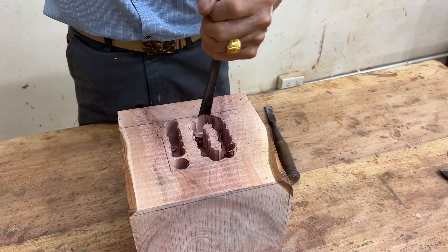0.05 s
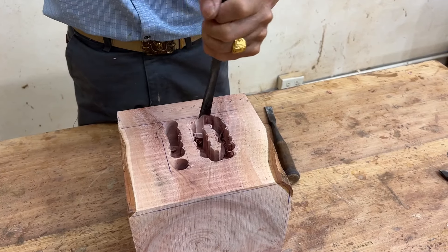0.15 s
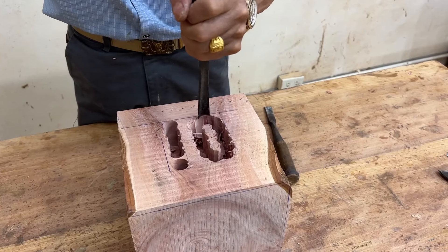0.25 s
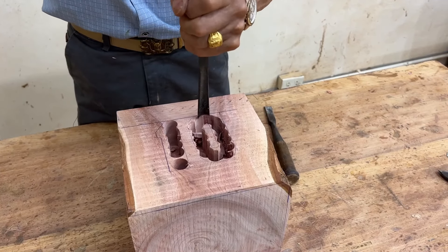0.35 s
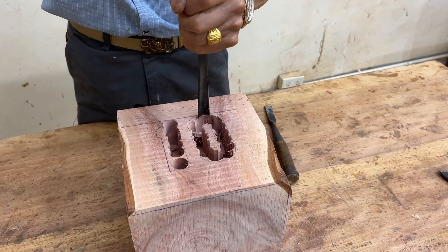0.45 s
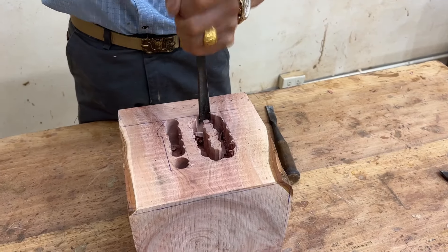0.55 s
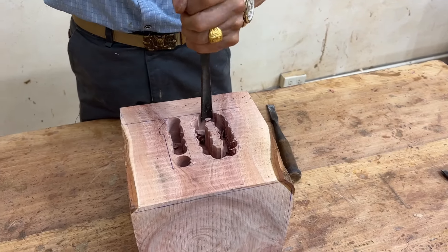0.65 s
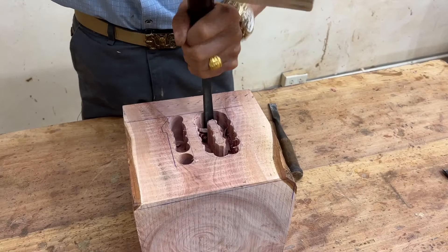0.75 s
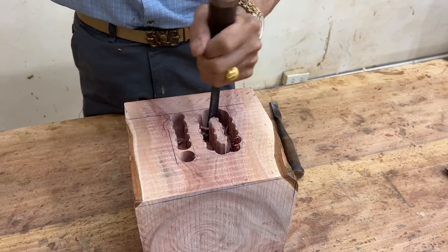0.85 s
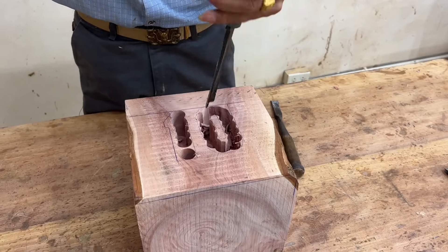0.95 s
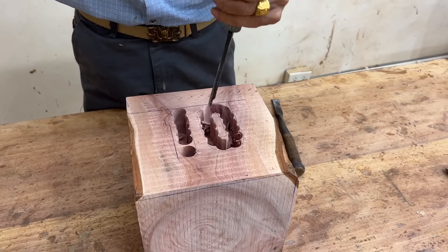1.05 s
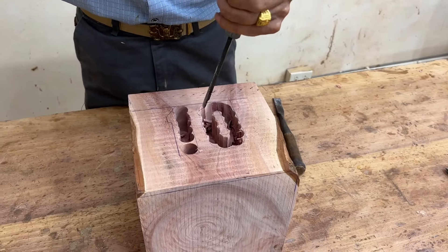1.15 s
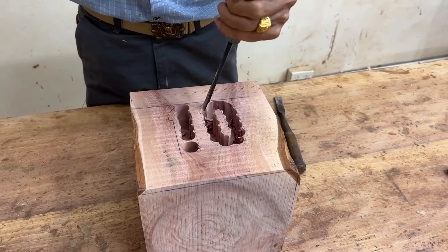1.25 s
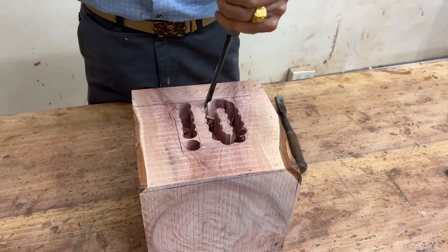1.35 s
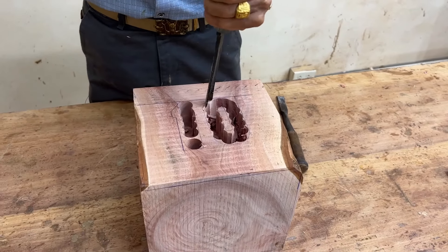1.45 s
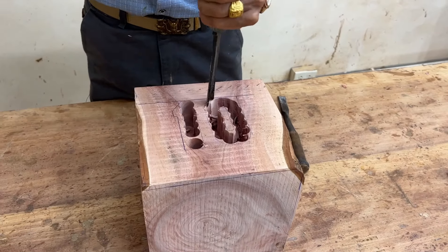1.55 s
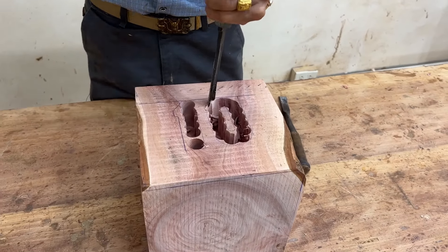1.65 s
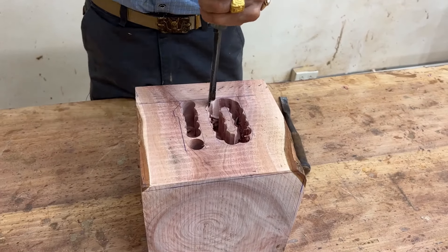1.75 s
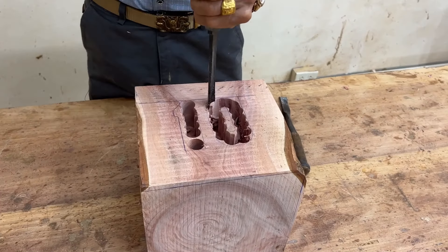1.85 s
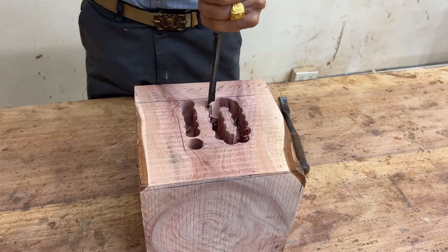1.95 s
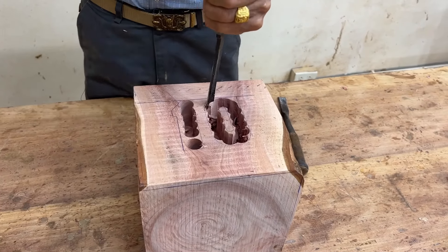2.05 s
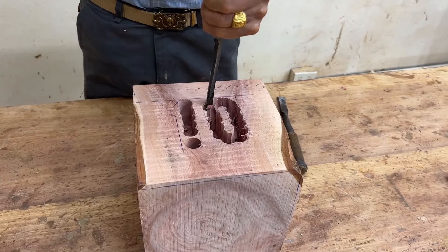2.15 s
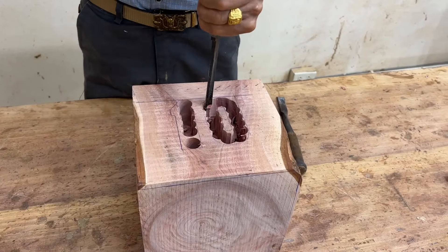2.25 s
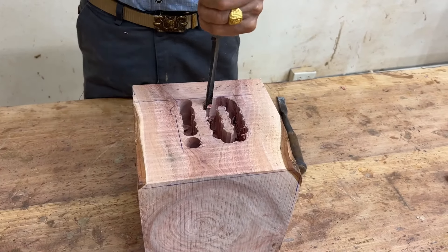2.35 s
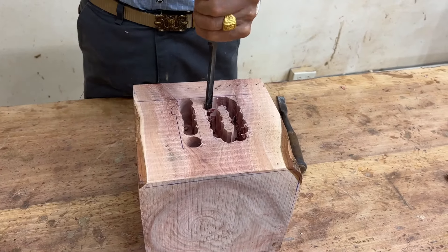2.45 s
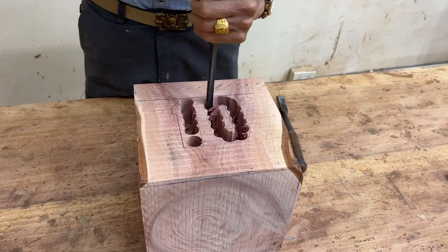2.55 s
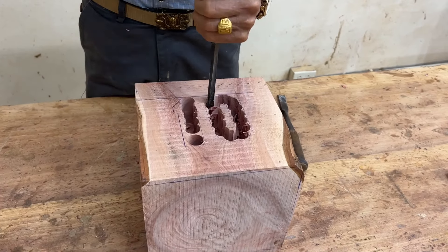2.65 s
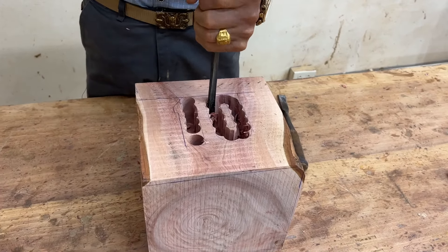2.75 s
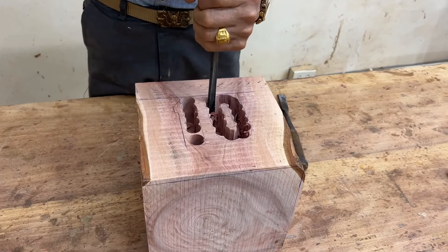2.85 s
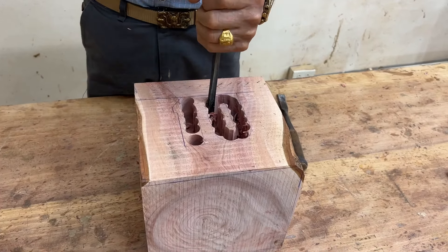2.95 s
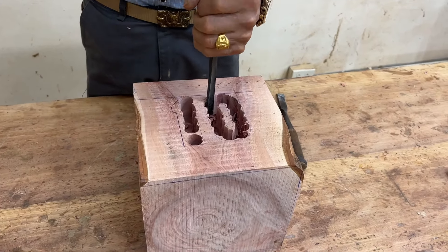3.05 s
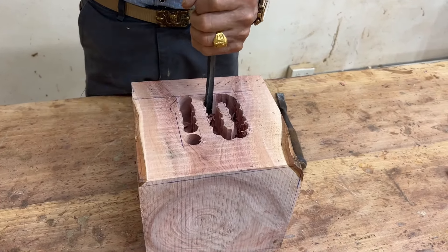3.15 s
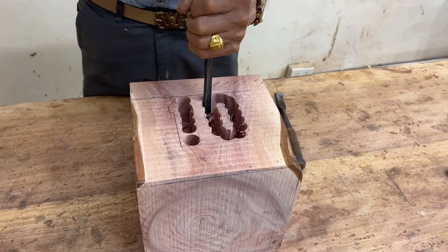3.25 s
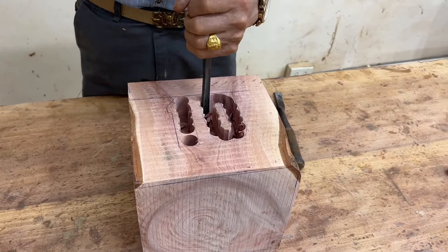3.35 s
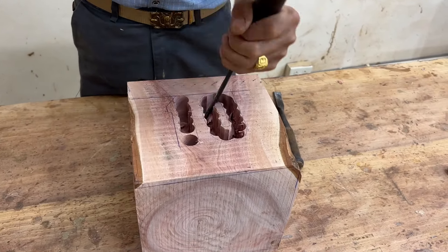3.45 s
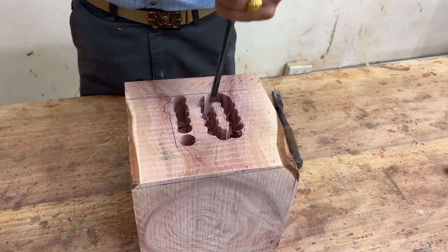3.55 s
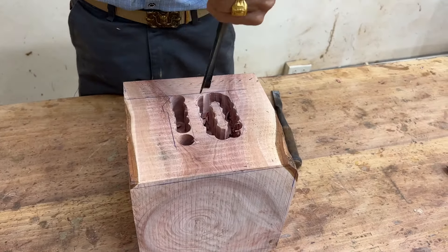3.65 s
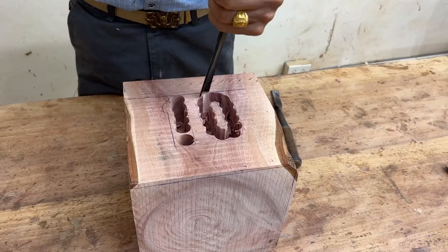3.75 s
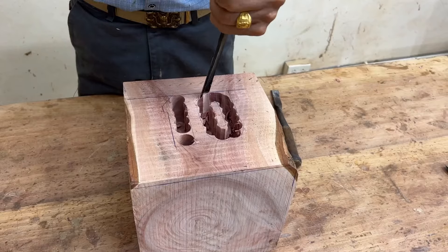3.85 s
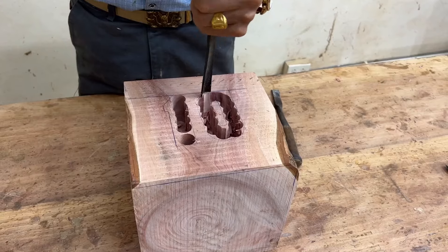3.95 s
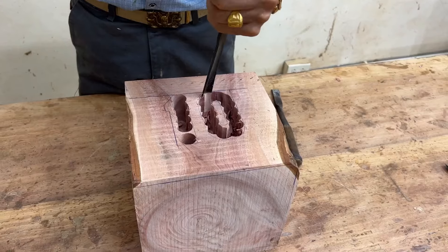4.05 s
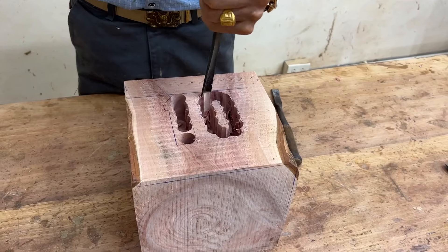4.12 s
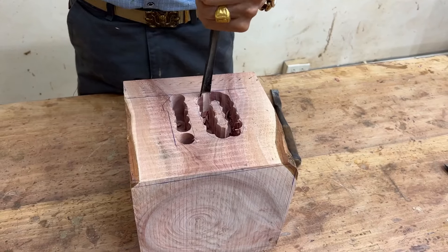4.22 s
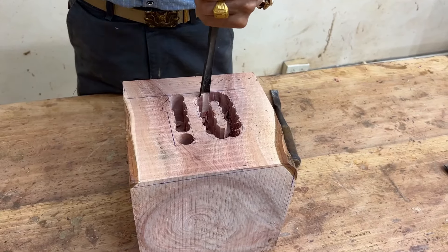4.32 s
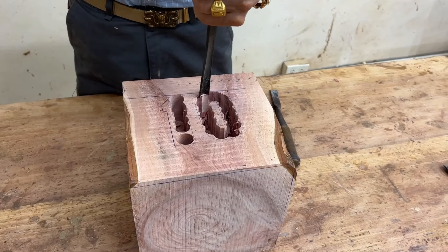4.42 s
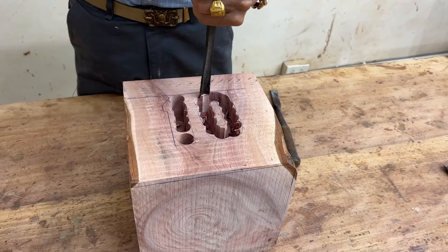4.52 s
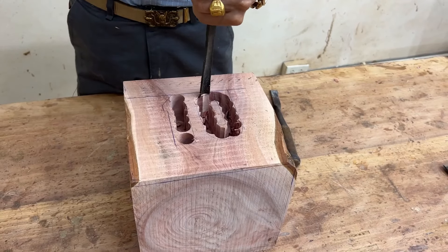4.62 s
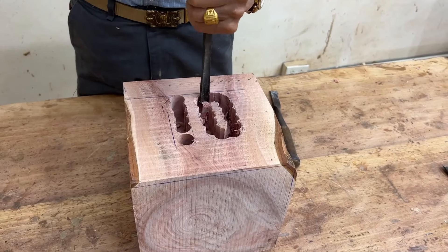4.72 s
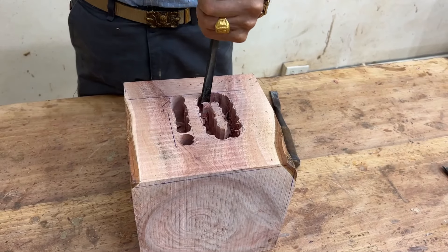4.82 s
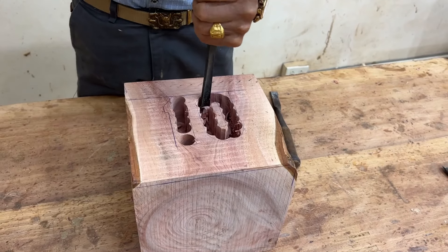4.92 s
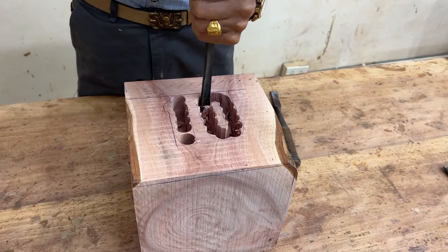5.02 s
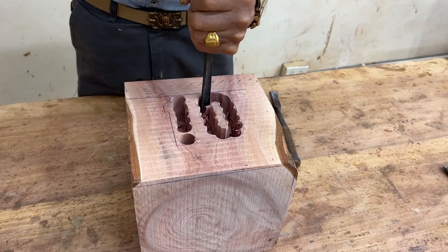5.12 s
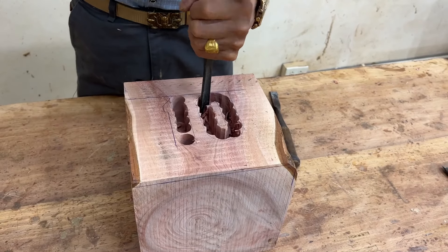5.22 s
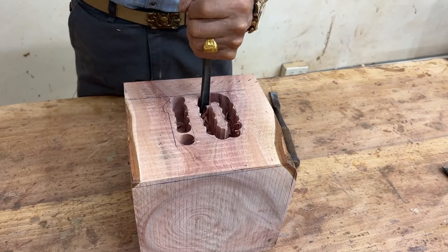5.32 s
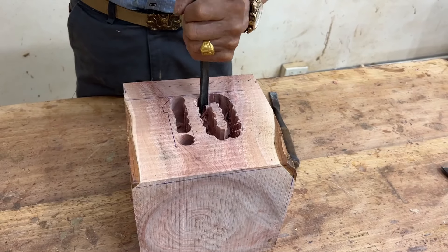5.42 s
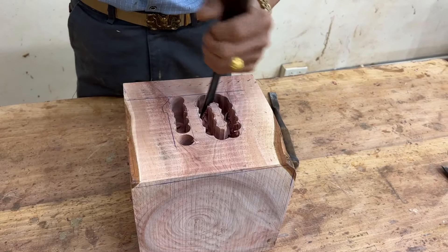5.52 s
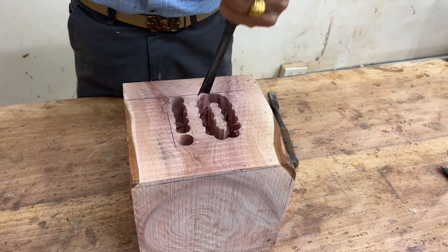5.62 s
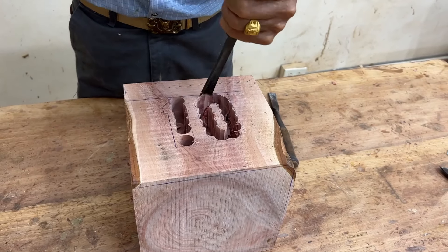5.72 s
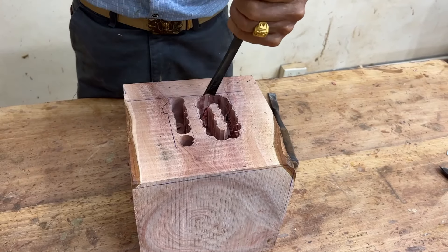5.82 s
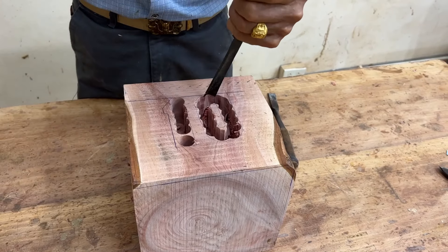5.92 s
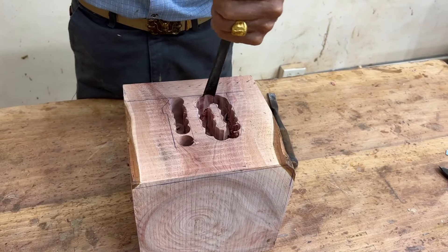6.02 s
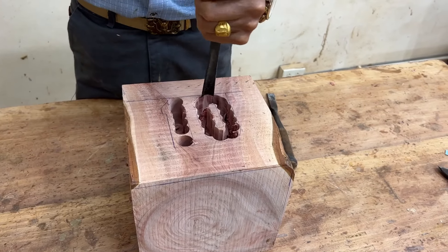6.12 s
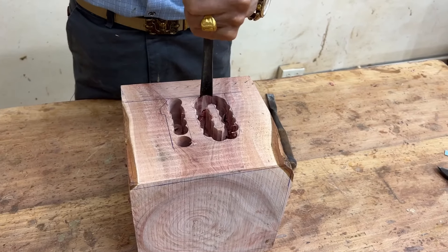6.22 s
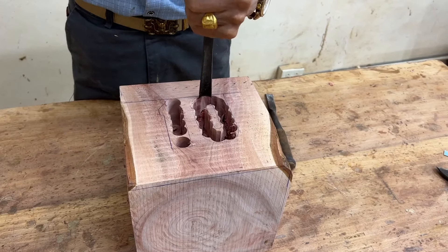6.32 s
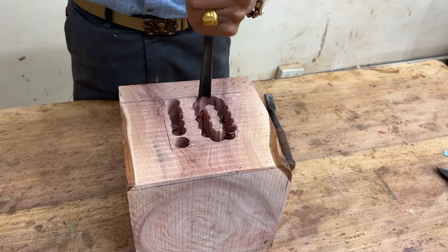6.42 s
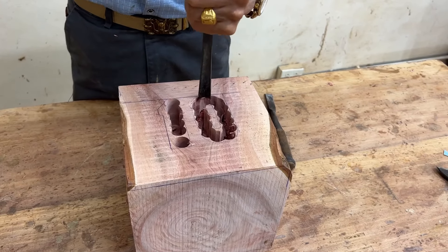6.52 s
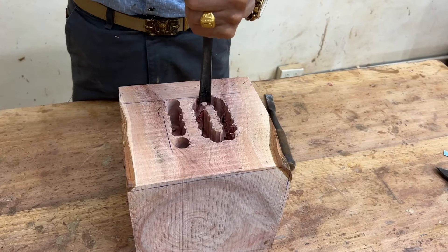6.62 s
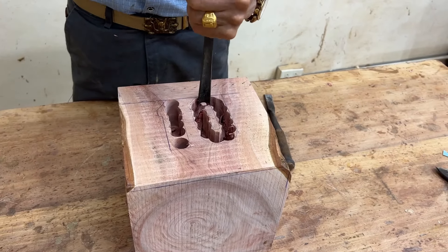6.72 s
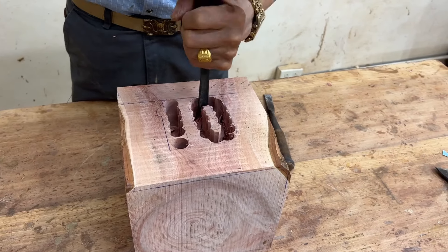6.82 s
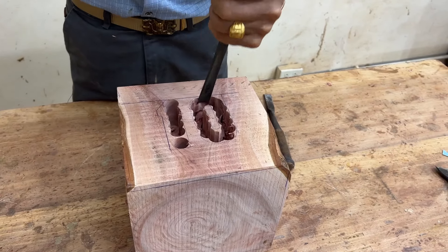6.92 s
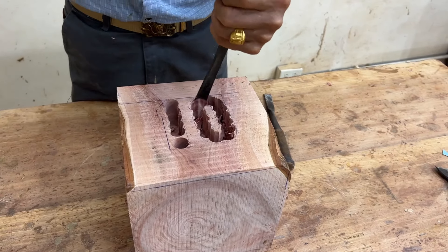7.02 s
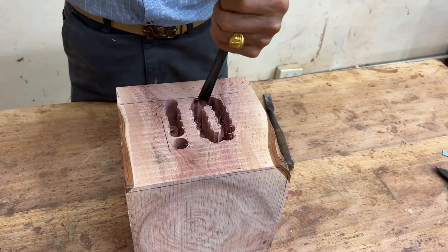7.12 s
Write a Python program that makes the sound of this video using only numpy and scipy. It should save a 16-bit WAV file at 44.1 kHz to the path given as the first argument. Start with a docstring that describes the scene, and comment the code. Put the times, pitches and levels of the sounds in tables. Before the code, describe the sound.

In a small hard-walled workshop, soft low bumps and a hollow scuff lead to two mallet blows on a chisel. After a pause, a steady run of seven sharp woody knocks follows, each booming through the bench. A dull thud, another pause, then six quicker blows. Light blade scratches and bumps precede three final knocks. Close stereo microphone, low airy room rush.

```python
"""Chiselling a hardwood block

A wooden mallet drives a chisel into a block on a workbench, in bursts of two to seven blows.
Decaying modes form the handle's clack, the mallet's knock and the block; a gliding mode booms the bench.
Shaped noise gives splitting fibres, chisel ring, scratches, hollow scuffs, soft bumps, rumble and a low rush.
Dull thuds of the block fall among the blows; a small hard-walled workshop adds early copies and a short tail.
"""
import sys
import numpy as np
from scipy import signal
from scipy.fft import rfft, irfft, next_fast_len
from scipy.io import wavfile
from scipy.ndimage import uniform_filter1d

SR = 44100
rng = np.random.default_rng(int(sys.argv[2]) if len(sys.argv) > 2 else 0)


def pcm_store(signal):
    """Save signal as 16-bit PCM."""
    levels = np.round(np.clip(np.atleast_2d(signal), -1, 1) * 32767)
    wavfile.write(sys.argv[1], SR, levels.astype(np.int16).T)


N = 316197
HIT = np.arange(SR * 3 // 5) / SR  # time since a contact, s

# All levels are relative: sources are normalised and may be trimmed where they are mixed.
# steady rush of the workshop: (f/Hz, level/dB)
AIR_SPECTRUM = [(59, -66), (100, -3), (153, -6), (193, -3.5), (266, -13), (350, -10.5), (398, -9.5),
                (492, -12.5), (648, -13.5), (721, -17), (1080, -18.5), (1610, -18.5), (3400, -37),
                (10200, -45), (16000, -67)]
# course of the rush before its trim: (t/s, level/dB)
AIR_COURSE = [(0, -45.5), (.9, -43), (3.4, -46), (3.9, -49), (5.7, -46), (7.17, -44)]
# balance of the rush: (f/Hz, left minus right level/dB)
AIR_BALANCE = [(200, -0.5), (700, -3.5), (2000, -4), (4400, 5.5), (8000, 3), (15000, -3)]
# rumble of the bench: (f/Hz, level/dB)
RUMBLE_SPECTRUM = [(12, -27), (20, -15), (75, -1), (123, -10), (156, -3.5), (189, -11), (271, -37.5),
                   (400, -21), (520, -74), (880, -120)]
# the worker's weight shifts on the bench; start to end sets the hold: (start t/s, end t/s, level/dB)
WEIGHT_SHIFTS = [(0.028, .34, -37), (6.28, 6.55, -36.5), (6.85, 7.17, -45.5)]
# soft bumps as the worker shifts against the bench: (t/s, level/dB)
SOFT_BUMPS = [(0.035, -31), (0.075, -34), (0.118, -33), (0.248, -31.5), (0.285, -28.5), (1.601, -39.5),
              (3.26, -42), (4.251, -51), (6.295, -38), (6.462, -29.5), (6.501, -43), (7.126, -35)]
# dull push of a bump: (f/Hz, level/dB)
BUMP_SPECTRUM = [(25, -4), (60, 20), (130, -5), (220, 0), (500, -39), (1500, -83)]
# hollow scuffs: (start t/s, level/dB, attack t/s, hold t/s, share of the deep colour 0-1)
HOLLOW_SCUFFS = [(0.359, -20.5, .008, 0.039, 0.25), (0.774, -24, 0.026, 0.017, 0.73),
                 (0.957, -34, 0.0099, .008, 0.99)]
# high colour of a scuff: (f/Hz, level/dB)
SCUFF_HIGH_SPECTRUM = [(100, -38), (280, -2), (450, 12), (750, 8.5), (1050, 4.5), (1400, -10.5),
                       (2200, -20.5), (5000, -55)]
# deep colour of a scuff: (f/Hz, level/dB)
SCUFF_DEEP_SPECTRUM = [(35, -47), (80, -2.5), (150, 0.5), (330, -3.5), (480, -4.5), (900, -44), (2000, -37),
                       (5000, -91)]
# the blade scratching in the cut: (centre t/s, level/dB, length t/s)
BLADE_SCRATCHES = [(0.405, -42.5, 0.061), (0.573, -56, .1), (1.763, -51, 0.013), (5.895, -44, 0.02),
                   (5.945, -52, 0.044), (6.038, -47.5, 0.036), (6.157, -47, 0.0098), (6.295, -47.5, 0.027),
                   (6.971, -49.5, 0.028), (7.032, -52, 0.03)]
# colour of a scratch: (f/Hz, level/dB)
SCRATCH_SPECTRUM = [(1500, 14), (3000, 4), (4400, -9), (5900, 10.5), (7200, -8), (10000, 2), (13000, -17),
                    (16000, -17)]
# the block thuds as the chisel is set or levered:
# (t/s, blade tick level/dB, block level/dB, bench level/dB, block f/Hz)
BLOCK_THUDS = [ (0.471, -47.5, -18.5, -19, 163.5), (0.861, -66, -19.5, -27, 247),
               (3.578, -61, -28.5, -24, 186.6), (5.669, -66, -33, -25, 190),
               (6.375, -50.5, -24.5, -23, 173), (6.866, -58, -17, -24, 208.4),
               (6.968, -74, -31.5, -35, 168), ]
# mallet blows: (t/s, handle clack level/dB, chisel ring level/dB, fibre crack level/dB,
# block level/dB, bench level/dB, block f/Hz)
MALLET_BLOWS = [ (0.658, -28, -33.5, -36.5, -24.5, -28.5, 175.5),
                (0.845, -19.5, -37, -37, -20.5, -31, 187.4),
                (1.894, -16.5, -35.5, -40.5, -23.5, -21, 186.6), (2.219, -13, -30.5, -36, -20, -19, 198),
                (2.509, -25.5, -29, -43, -25.5, -21.5, 188), (2.795, -15, -31.5, -39, -25, -24, 185.3),
                (3.081, -24.5, -33.5, -44.5, -21.5, -19, 189.4), (3.314, -21.5, -32, -39, -20, -17.5, 196),
                (3.476, -28, -46, -40.5, -23, -23.5, 212), (4.512, -26.5, -43.5, -42, -28, -22, 178),
                (4.741, -15.5, -33.5, -36, -27.5, -25.5, 164.5), (4.948, -15, -36, -38, -25.5, -28.5, 176),
                (5.134, -16.5, -34, -39, -32.5, -27.5, 172), (5.324, -14.5, -36, -40, -22.5, -29, 248.7),
                (5.508, -26, -35.5, -37.5, -20, -20.5, 231.6),
                (6.533, -28.5, -46.5, -42.5, -23.5, -21, 174.7), (6.687, -22, -36, -38.5, -26, -26.5, 176),
                (6.851, -20.5, -38, -38.5, -25.5, -30, 190), ]
# modes of the chisel handle: (f/Hz, level/dB, t60/s)
HANDLE_MODES = [(1306, 7, 0.0099), (1488, 2.5, 0.019), (1607, 5, 0.015), (1740, -1, 0.02),
                (1956, 0.5, 0.0053), (3243, -19.5, 0.014)]
# modes of the knock: the mallet head's, and lowest a fixed resonance of the block (f/Hz, level/dB, t60/s)
KNOCK_MODES = [(384.4, -6.5, 0.066), (564, 3, 0.016), (709, 3, 0.018), (826, 0, 0.025),
               (1040, -1.5, 0.021), (1290, -0.5, 0.01)]
# modes of the block, pitched by how it sits on the bench: (multiple of block f, level/dB, t60/s)
BLOCK_MODES = [(0.999, 3.5, 0.05), (1.203, -4, 0.069), (1.55, -5.5, 0.091), (1.949, -4, 0.064)]
# parting fibres: (f/Hz, level/dB)
CRACK_SPECTRUM = [(800, -29), (2500, 1.5), (4000, -7.5), (5400, -4), (6600, -11), (8100, 0), (10000, -7),
                  (13000, -9.5), (16000, -14)]
# chisel and mallet ringing on: (f/Hz, level/dB)
RING_SPECTRUM = [(700, -46), (900, -6), (1150, -12), (1380, -7.5), (1500, 1), (1575, 2), (1660, -8),
                 (1850, -13), (2300, -28.5), (3250, -36.5), (4100, -55), (5300, -30.5), (7000, -46.5),
                 (12000, -77)]
# low noise of the bench legs: (f/Hz, level/dB)
LEGS_SPECTRUM = [(25, 3.5), (45, -16), (85, 23), (140, 21), (220, -8), (600, -91)]
# deep shudder of the whole bench: (f/Hz, level/dB)
JOLT_SPECTRUM = [(15, -14), (35, -3), (60, -8), (100, -2), (250, -50), (600, -100)]
# decay of the room tail between hard walls: (f/Hz, t60/s)
WALL_DECAY = [(100, 0.39), (300, 0.42), (700, 0.51), (1600, 0.34), (4000, 0.42), (10000, 0.14),
              (16000, 0.042)]

RUMBLE_DB = -53.5  # the bench at rest
SHIFT_RISE_S, SHIFT_T60_S = 0.018, 1.4  # attack and release of the rumble
SCUFF_T60_S = 0.38  # release of a scuff
SCUFF_TAIL_DB, SCUFF_TAIL_T60_S = -10, 1.05  # its deep part lingers
TICK_WOOD_DB, TICK_HANDLE_DB = 7, 7  # wood and handle against the blade's tick
SOFT_HZ = 340  # a thud is a soft contact: the block's modes above this are barely rung
USUAL_CLACK_DB = -21
BRIGHTENS, BRIGHT_FROM_HZ = 0.67, 2140  # tilt above this pitch: dB per octave for each dB of harder clack
MALLET_DB, MALLET_GROWS = -28, 0.33  # mallet head at a usual blow; dB gained per dB of clack
BENCH_HZ, BENCH_DETUNE = 104.63, 0.016  # lowest mode of the bench top; its relative random spread
# phase offset of the boom between left and right at this level: smaller for louder booms
SPREAD_RAD, SPREAD_DB, SPREAD_HALVES_DB = 1.1, -21, 4
JOLT_DB, JOLT_T60_S = -15, 0.16  # shudder of the bench against its boom
LEAD_S, LEAD_HALVES_DB = 0.0057, 20  # swell time of the lead-in noise; shorter for louder clacks
LEAD_RING_DB, LEAD_RING_FALLS = 5, 0.62  # ring-coloured lead-in noise; dB lost per dB of clack
RING_DETUNE = 0.011  # random relative spread of the ring's pitch from blow to blow
TOP_HZ = 16200  # band limit of the recorder


def amp(db):
    """Logarithmic level: decibels become an amplitude ratio."""
    return 10 ** (np.asarray(db) / 20)


def unit(x):
    """Mean power: the signal is scaled to rms 1."""
    return x / np.sqrt(np.mean(x ** 2) + 1e-20)


def over(x, seconds):
    """Onset power: the signal is scaled to rms 1 over its first seconds."""
    return x / np.sqrt(np.mean(x[..., :int(seconds * SR)] ** 2) + 1e-20)


def along(points, hz):
    """Logarithmic pitch: values are interpolated between (f/Hz, value) points."""
    f, v = np.transpose(points)
    return np.interp(np.log(hz + 1), np.log(f + 1), v)


def filtered(x, response):
    """Linear filtering: the spectrum is multiplied by a function of frequency."""
    n = x.shape[-1]
    padded = next_fast_len(n + 8192)
    hz = np.fft.rfftfreq(padded, 1 / SR)
    return irfft(rfft(x, padded) * response(hz), padded)[..., :n]


def noise(spectrum, size, mono_hz=40):
    """Interaural coherence: shaped stereo noise of rms 1 grows less alike in the ears above mono_hz."""
    a, b = rng.standard_normal((2, size))
    turn = lambda hz: np.pi / 4 * hz / (hz + mono_hz)
    mid = filtered(a, lambda hz: amp(along(spectrum, hz)) * np.cos(turn(hz)))
    side = filtered(b, lambda hz: amp(along(spectrum, hz)) * np.sin(turn(hz)))
    return unit(np.array([mid + side, mid - side]))


def fade(t60, attack, t=HIT):
    """Damping: a quick rise and an exponential decay of 60 dB per t60."""
    return amp(-60 * t / t60) * (1 - np.exp(-t / attack))


def envelope(start, attack, hold, t60):
    """Driven source: a straight rise, a hold and an exponential release."""
    t = np.arange(N) / SR - start
    return np.clip(t / attack, 0, 1) * amp(-60 * np.maximum(t - attack - hold, 0) / t60)


def struck(modes, attack, lag, left_db, detune, flip=-1):
    """Modal superposition: damped sines of varied strength and pitch reach the left later and weaker."""
    t = np.maximum(HIT - np.array([[lag], [0]]), 0)
    chance = rng.standard_normal((len(modes), 2))
    ring = np.zeros((2, len(HIT)))
    for k, ((hz, db, t60), (strength, pitch)) in enumerate(zip(modes, chance)):
        # flip: -1 alternates the polarity of the modes; a positive value starts all in step
        level = flip ** k * amp(db + 2 * strength)
        ring += level * fade(t60, attack, t) * np.sin(2 * np.pi * hz * (1 + detune * pitch) * t)
    return ring * amp([[left_db], [0]])


def add(track, s, x):
    """Superposition in time: x is mixed into the track from time s."""
    part = track[:, max(round(s * SR), 0):][:, :x.shape[-1]]
    part += x[:, :part.shape[-1]]


def room(x):
    """Reverberation: the right channel feeds a diffuse tail whose decay depends on frequency."""
    hz, t, z = signal.stft(rng.standard_normal((2, len(HIT))), SR, nperseg=256)
    decay = amp(-60 * t / along(WALL_DECAY, hz)[:, None])
    tail = signal.istft(z * decay, SR, nperseg=256)[1][:, :len(HIT)]
    tail = tail * (1 - np.exp(-HIT / 0.002))
    return signal.fftconvolve(x[1:], tail / np.linalg.norm(tail[0]), axes=1)[:, :x.shape[-1]]


def near_walls(x, count=8):
    """Early reflection: weak delayed copies come off the bench top and the wall behind it."""
    out = np.zeros_like(x)
    for channel in range(2):
        delays = rng.uniform(.004, .024, count)  # s
        for late, sign in zip(delays, rng.choice([-1, 1], count)):
            add(out[channel:channel + 1], late, sign * amp(-300 * late) * x[1:])
    return out / np.sqrt(count)


def background():
    """Stationary noise: an airy rush, over a bench rumble that swells when weight shifts on it."""
    t = np.arange(N) / SR
    halves = np.array([[.5], [-.5]])  # left, right
    air = filtered(noise(AIR_SPECTRUM, N, mono_hz=3.4), lambda hz: amp(halves * along(AIR_BALANCE, hz)))
    air_db = np.interp(t, *np.transpose(AIR_COURSE)) + 4
    sway = amp(RUMBLE_DB)
    for start, end, db in WEIGHT_SHIFTS:
        sway = sway + amp(db) * envelope(start, SHIFT_RISE_S, end - start, SHIFT_T60_S)
    return amp(air_db) * air + sway * noise(RUMBLE_SPECTRUM, N, mono_hz=23)


def bumping():
    """Heavily damped impact: dull low noise pushes with no ring."""
    track = np.zeros((2, N))
    for s, db in SOFT_BUMPS:
        push = fade(0.065, 0.003) * noise(BUMP_SPECTRUM, len(HIT), mono_hz=29)
        add(track, s, amp(db) * over(push, 0.057))
    return track


def scuffing():
    """Friction noise: hollow scuffs, each deeper than the last, whose deep part dies slowest."""
    high, deep = np.zeros((2, N))
    for s, db, attack, hold, share in HOLLOW_SCUFFS:
        stroke = amp(db) * envelope(s, attack, hold, SCUFF_T60_S)
        tail = amp(db + SCUFF_TAIL_DB) * envelope(s, attack, hold, SCUFF_TAIL_T60_S)
        high += np.sqrt(1 - share) * stroke
        deep += np.maximum(np.sqrt(share) * stroke, tail)
    dry = deep * noise(SCUFF_DEEP_SPECTRUM, N) + high * noise(SCUFF_HIGH_SPECTRUM, N)
    return dry + amp(-8.5) * room(dry)


def scratching():
    """Amplitude modulation: grainy noise strokes as the edge drags over torn fibres."""
    t = np.arange(N) / SR
    strokes = sum(amp(db) * np.exp(-2 * ((t - s) / length) ** 2) for s, db, length in BLADE_SCRATCHES)
    wander = unit(uniform_filter1d(rng.standard_normal(N), size=60))
    grain = unit(amp(1.5 * wander))
    dry = strokes * grain * noise(SCRATCH_SPECTRUM, N)
    return dry + amp(-13) * room(dry)


def handle_clack(db):
    """Impact spectrum: the wooden handle's modes ring brighter when hit harder than usual."""
    tilt_db = BRIGHTENS * max(db - USUAL_CLACK_DB, 0)
    modes = [(hz, level + tilt_db * max(np.log2(hz / BRIGHT_FROM_HZ), 0), t60)
             for hz, level, t60 in HANDLE_MODES]
    clack = struck(modes, attack=0.00053, lag=0.002003, left_db=-13, detune=0.027)
    return amp(db) * over(clack, 0.011)


def wood_knock(db):
    """Modal resonance: the mallet head's short modes and a steady low mode of the block make a hollow knock of
    wood on wood."""
    knock = struck(KNOCK_MODES, attack=0.00044, lag=0.0028, left_db=-13, detune=0.037)
    return amp(db) * over(knock, 0.017)


def fibres(crack_db, size):
    """Contact bandwidth: parting fibres make broad noise, and a light contact only a dull tick."""
    corner_hz = 14000 * amp(0.96 * (crack_db + 39.5))
    return unit(filtered(noise(CRACK_SPECTRUM, size), lambda hz: 1 / np.sqrt(1 + (hz / corner_hz) ** 4)))


def fibre_crack(db):
    """Fracture noise: fibres part in one snap, then crumble briefly."""
    snap = fade(0.01, 0.0015) + amp(-33) * fade(0.1, 0.0054)
    return amp(db) * over(snap * fibres(db, len(HIT)) * amp([[-2.5], [0]]), 0.018)


def block_knock(db, block_hz, soft_hz=np.inf):
    """Boundary-dependent modes: the block's seat sets its pitch; a soft contact spares the upper modes."""
    seated = []
    for multiple, level, t60 in BLOCK_MODES:
        hz = multiple * block_hz
        seated.append((hz, level - 10 * np.log10(1 + (hz / soft_hz) ** 8), t60))
    knock = struck(seated, attack=0.0044, lag=0.00074, left_db=-1, detune=0.049, flip=0.94)
    return amp(db + 0.5) * over(knock, 0.036)


def bench(hz, spread):
    """Contact stiffness: the top's lowest mode starts sharp while the block is pressed hard against it."""
    cycles = hz * np.cumsum(1 + 2.05 * np.exp(-HIT / 0.0033)) / SR
    boom = fade(0.37, 0.0041) * np.sin(2 * np.pi * cycles - np.array([[spread], [0]]))
    legs = fade(0.46, 0.0017) * noise(LEGS_SPECTRUM, len(HIT), mono_hz=121)
    return over(boom + amp(-8) * legs, .09)


def bench_boom(db):
    """Coupled structures: the top booms and the frame shudders under it."""
    spread = min(SPREAD_RAD * 2 ** ((SPREAD_DB - db) / SPREAD_HALVES_DB), 2 * np.pi / 3)
    boom = bench(BENCH_HZ * (1 + BENCH_DETUNE * rng.standard_normal()), spread)
    jolt = over(fade(JOLT_T60_S, 0.0062) * noise(JOLT_SPECTRUM, len(HIT)), 0.27)
    return amp(db) * (boom + amp(JOLT_DB) * jolt)


def contact(handle, mallet, crack, block, boom):
    """Transmission: a contact travels down the chisel into block and bench, and the walls answer."""
    early = near_walls(amp(-5) * (handle + mallet) + amp(-2.5) * crack)
    late = room(amp(-28) * handle + amp(-10.5) * mallet + amp(-12) * crack + amp(-9) * block)
    out = handle + mallet + crack + early + late
    add(out, .002, block + boom)
    return out


def thudding():
    """Soft impact: the block drops back on the bench, with at most a tick from the blade."""
    track = np.zeros((2, N))
    for s, tick_db, block_db, bench_db, block_hz in BLOCK_THUDS:
        handle = handle_clack(tick_db + TICK_HANDLE_DB)
        wood = wood_knock(tick_db + TICK_WOOD_DB)
        block = block_knock(block_db, block_hz, SOFT_HZ)
        add(track, s, contact(handle, wood, fibre_crack(tick_db), block, bench_boom(bench_db)))
    return track


def lead_in_swell(seconds):
    """Exponential growth: the level rises by a factor e per given time, up to its last sample."""
    t = HIT[:SR // 25]
    return np.exp(-t[::-1] / max(seconds, .0005))


def chisel_ring(db):
    """Dense modes: a noise cluster strongest near 1.5 kHz outlasts the clack."""
    shift = 1 + RING_DETUNE * rng.standard_normal()
    cluster = noise([(hz * shift, level) for hz, level in RING_SPECTRUM], len(HIT))
    return amp(db + 2.5) * over(fade(0.47, 0.00088) * cluster * amp([[-3.5], [0]]), 0.069)


def blow(clack_db, ring_db, crack_db, block_db, bench_db, block_hz):
    """Impulse excitation: one blow sounds every part, the mallet's knock following the clack's level."""
    mallet = wood_knock(MALLET_DB + MALLET_GROWS * (clack_db - USUAL_CLACK_DB))
    block = block_knock(block_db, block_hz)
    struck_parts = contact(handle_clack(clack_db), mallet, fibre_crack(crack_db), block, bench_boom(bench_db))
    return chisel_ring(ring_db) + struck_parts


def chopping():
    """Level dependence: a brief noise swell precedes each blow, shorter and with less ring if harder."""
    track = np.zeros((2, N))
    for s, clack_db, ring_db, crack_db, *body in MALLET_BLOWS:
        force_db = clack_db - USUAL_CLACK_DB
        swell = lead_in_swell(LEAD_S * 2 ** (-force_db / LEAD_HALVES_DB))
        lead_ring_db = ring_db + LEAD_RING_DB - LEAD_RING_FALLS * force_db
        ring_noise = amp(lead_ring_db) * noise(RING_SPECTRUM, len(swell))
        crack_noise = amp(crack_db + 3.5) * fibres(crack_db, len(swell))
        add(track, s - len(swell) / SR, swell * (crack_noise + ring_noise))  # ends as the blow lands
        add(track, s, blow(clack_db, ring_db, crack_db, *body))
    return track


def scene():
    """Superposition: everything heard at the bench is summed."""
    return background() + bumping() + scuffing() + scratching() + thudding() + chopping()


def record(dry):
    """Saturation and band limit: the recorder rounds the highest peaks and drops the extreme treble."""
    rounded = dry / (1 + np.abs(dry / .9) ** 8) ** (1 / 8)
    return filtered(rounded, lambda hz: hz < TOP_HZ)


dry = scene()
out = record(dry)
pcm_store(out)
```